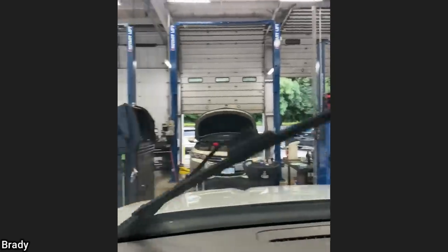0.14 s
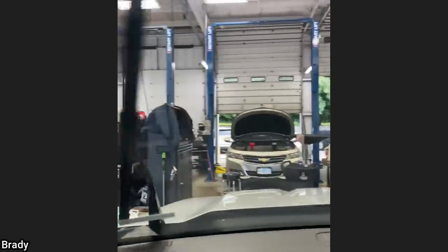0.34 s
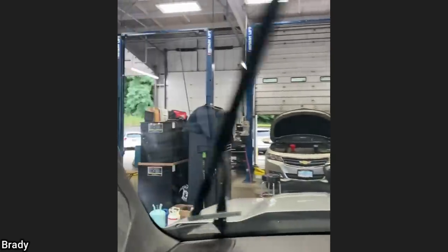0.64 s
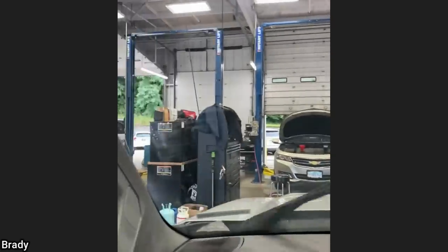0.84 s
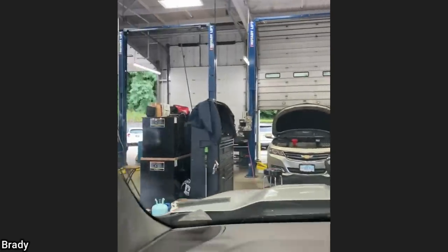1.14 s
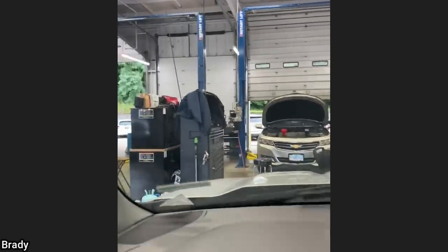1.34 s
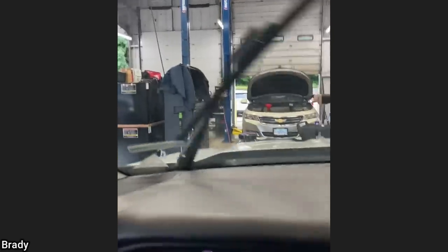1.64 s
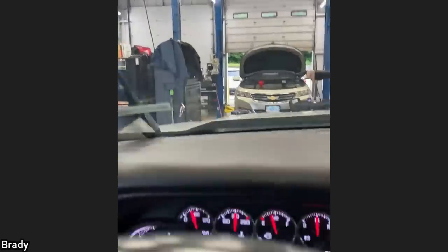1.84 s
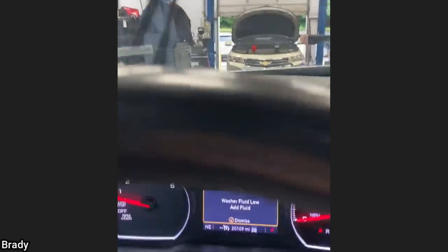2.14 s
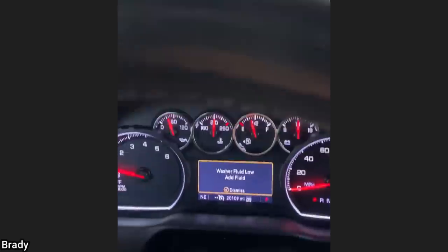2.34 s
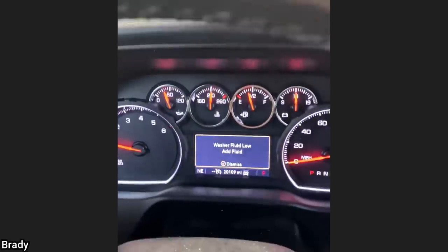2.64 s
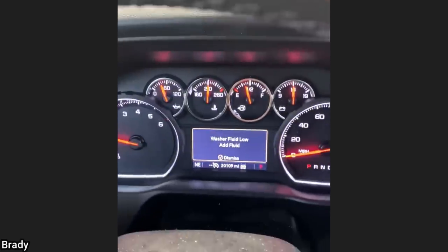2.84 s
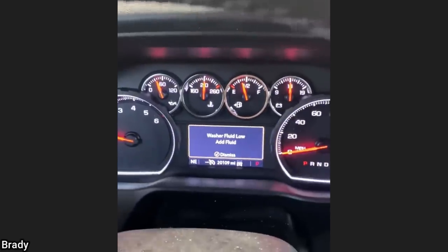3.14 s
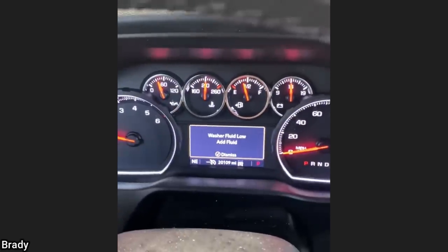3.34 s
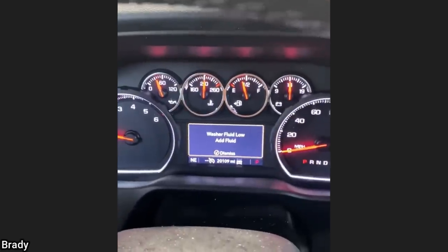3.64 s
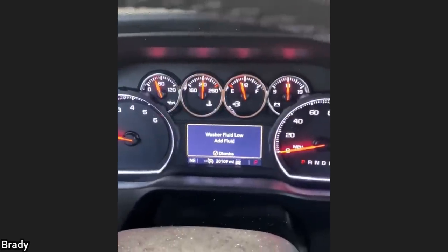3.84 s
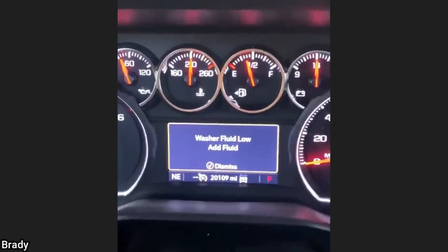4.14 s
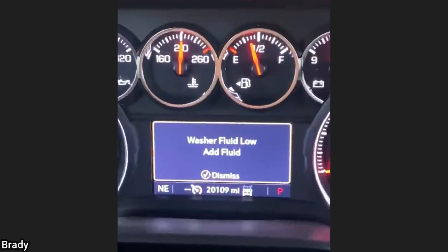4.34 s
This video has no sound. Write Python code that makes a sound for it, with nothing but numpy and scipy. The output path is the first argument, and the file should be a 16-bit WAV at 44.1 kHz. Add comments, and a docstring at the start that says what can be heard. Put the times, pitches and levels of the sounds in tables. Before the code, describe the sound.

A clean mid-pitched electric whine opens, slides downward and stops at about one second. Dry rubber wipers keep sweeping, with gritty scrubbing, airy hiss and little snaps. Every reversal gives a boomy thud with a rattle, alternating firm and soft around every seven tenths of a second. The close stereo microphone sits in the small cab; the background is very quiet, with two brief late hisses.

```python
"""Inside a parked cab a dry washer pump whines, clean shaft tones that run down and ring the panels around it.
Meanwhile the wipers sweep dry glass: shaped noise hisses and scrubs, and the motor rumbles in the body.
Small ticks snap along the sweep; the arms thump ringing panels at each reversal, hard at the top and softer
at the bottom. Later come two short bright puffs of hiss.
A close pair of microphone ports hears it."""
import sys
import numpy as np
from scipy import signal
from scipy.io import wavfile
from scipy.ndimage import uniform_filter1d

SR = 44100
rng = np.random.default_rng(int(sys.argv[2]) if len(sys.argv) > 2 else 0)


def transcribe(u):
    """Save the signal u as a 16-bit wav file named by the first command-line argument.

    u: samples, shape (n,) or (channels, n), limited to [-1, 1]; the rate is SR.
    q: integer samples, one column per channel.
    """
    v = np.clip(np.atleast_2d(u).T, -1, 1)
    q = np.round(v * 32767).astype(np.int16)
    wavfile.write(sys.argv[1], SR, q)


N = 197564

# Reversals of the arms: (time [s], blow and rattle [dB], crack [dB])
TOP_TURNS = [(0.5384, 0, 3), (1.962, 0.5, -1), (3.3835, -1, -2.5)]
BOTTOM_TURNS = [(1.2426, -1.5, .4), (2.6643, -2.5, 0.25), (4.084, -1, 0.14)]
CYCLE_S = 1.4218  # one sweep up and back


def amp(db):
    """Decibels to an amplitude factor."""
    return 10 ** (np.asarray(db) / 20)


def evened(x):
    """Scale a signal to an rms of 1."""
    return x / np.sqrt(np.mean(x ** 2) + 1e-20)


def read(points, hz):
    """Read a (frequency, value) table along a logarithmic pitch axis."""
    f, value = np.transpose(points)
    return np.interp(np.log(hz + 1), np.log(f + 1), value)


def curve(rows, index):
    """Draw one column of a table against time, the first column."""
    return np.interp(np.arange(N) / SR, [r[0] for r in rows], [r[index] for r in rows])


def add(mix, s, sound):
    """Lay a sound into the mix at s seconds, cut off at the end."""
    part = mix[..., round(s * SR):][..., :sound.shape[-1]]
    part += sound[..., :part.shape[-1]]


def noise(colour, size, patchy_db, flicker_db):
    """Two-port noise of rms 1 with drifting patches and a flicker shared by all pitches."""
    # Likeness of the two ports: (frequency [Hz], likeness [0-1])
    likeness = [(60, .9995), (100, .998), (140, .99), (210, .95), (330, .87), (500, .66), (770, .4),
                (1200, .45), (1800, .6), (2800, .55), (4200, .5), (6400, .67), (9800, .45), (15000, .6)]
    # How much louder the left port is: (frequency [Hz], left-right level [dB])
    balance = [(60, .5), (200, 1), (380, 1.2), (700, 2.5), (1300, 1), (2400, -.6), (4400, -1.4), (8000, 0)]
    # How far the left port leads: (frequency [Hz], phase [rad])
    phase_lead = [(700, 0), (1030, -.4), (1800, .2), (2800, 2.4), (4200, 4.4), (5300, 6.2), (15000, 6.4)]
    hop = size // 4
    frames, hz = N // hop + 5, np.fft.rfftfreq(size, 1 / SR)
    a, b, c, d, patches = rng.standard_normal((frames, len(hz), 5)).T
    patches = uniform_filter1d(patches, size=8, axis=0)  # across pitch
    patches = evened(uniform_filter1d(patches, size=12, axis=1))  # across time
    flicker = evened(uniform_filter1d(rng.standard_normal(frames), size=4))

    same = np.clip(read(likeness, hz), 0, 1)[:, None]
    left = a + 1j * b
    right = same * left + np.sqrt(1 - same ** 2) * (c + 1j * d)
    right = right * np.exp(-1j * read(phase_lead, hz))[:, None]
    lean = amp(read(balance, hz) / 2)[:, None]
    level = amp(read(colour, hz)[:, None] + patchy_db * patches + flicker_db * flicker)
    spectra = np.array([left * lean, right / lean]) * level
    return evened(signal.istft(spectra, nperseg=size, noverlap=size - hop)[1][:, :N])


def ports(db, turn, pan_db, lead):
    """A tone whose level and phase differ at the two ports."""
    left = 2 / (1 + amp(-pan_db))
    return np.sqrt(2) * amp(db) * np.array([left * np.sin(turn + lead), (2 - left) * np.sin(turn)])


def shaft_hz(t):
    """The speed under power; then drag in proportion to speed and a steady rubbing slow the shaft."""
    # Shaft speed, sagging most as the wipers load the supply: (time [s], speed [Hz])
    powered_speed = [(0, 425.6), (.4, 423.5), (.55, 420), (.765, 419.8)]
    coast_tau_s, rubbing_hz = .255, 150
    slowing = np.exp(-np.maximum(t - powered_speed[-1][0], 0) / coast_tau_s)
    return np.maximum(curve(powered_speed, index=1) * slowing - rubbing_hz * (1 - slowing), 0)


def pump():
    """Clean shaft tones under power; then the coasting shaft rings panel after panel as it slows."""
    # Pump under power: (time [s], shaft tone [dB], its octave [dB])
    shaft_tones = [(0, -39, -46), (.14, -41, -49.5), (.25, -36, -56), (.36, -35, -67.5), (.46, -36, -62),
                   (.54, -38, -57), (.62, -35.5, -58), (.765, -35.5, -57.5)]
    # Higher orders: (multiple of shaft speed, level at first [dB], level once swelled [dB],
    # left-right level [dB], left lead [rad])
    higher_orders = [(3, -75, -73, 2.2, .3), (4, -68, -65, -1.1, .7), (5, -71, -63.5, -3.1, 1.1),
                     (6, -73, -62.5, -1.1, 1.5), (7, -80, -77, -2.1, 1.6), (8, -79, -75, -1.1, 1.6),
                     (9, -82, -79, .1, 1.6)]
    # Orders of the coasting shaft: (multiple of shaft speed, level before the panels [dB])
    coast_orders = [(1, 0), (2, -14), (3, -10)]
    # Panels around the pump, each passed twice: (resonance [Hz], width of one pass [Hz], level [dB])
    panels = [(405, 44, -35), (348, 34, -24), (272, 30, -29), (164, 24, -26), (500, 50, -29),
              (600, 60, -31), (745, 50, -35)]
    # Impeller noise: (frequency [Hz], relative density [dB])
    whirr_colour = [(250, -13), (500, -6), (900, -3), (1400, 11.5), (2500, -19.5), (3500, -33.5),
                    (5000, -35.5), (9000, -53)]
    off_s, rest_s = .785, 1.05
    buzz_from_s, buzz_rise_s = .3, .18  # the higher orders swell once
    whirr_db = -62.5  # at the starting speed

    t = np.arange(N) / SR
    hz = shaft_hz(t)
    speed = hz / hz[0]
    turn = 2 * np.pi * np.cumsum(hz) / SR
    spinning = np.clip((rest_s - t) / .028, 0, 1)
    powered = np.clip((off_s - t) / .012, 0, 1)  # magnetic orders stop with the current

    run = t / off_s  # the tones drift across the ports
    out = ports(curve(shaft_tones, index=1), turn, 9.5 - 4.5 * run, .5 - .37 * run)
    out += ports(curve(shaft_tones, index=2), 2 * turn, 9.1 - 21 * run, .41)
    swell = np.clip((t - buzz_from_s) / buzz_rise_s, 0, 1)
    for k, first_db, last_db, pan_db, lead in higher_orders:
        waver_db = 1.3 * evened(uniform_filter1d(rng.standard_normal(N), size=2000))
        out += ports(first_db + (last_db - first_db) * swell + waver_db, k * turn, pan_db, lead)
    out *= powered

    coasting = sum(speed ** (k - 1) * ports(db, k * turn, 2.4 * speed, .1) for k, db in coast_orders)
    coasting *= (1 - powered) * spinning
    # The dry impeller drags unevenly
    coasting *= 1 + .45 * evened(uniform_filter1d(rng.standard_normal(N), size=300))
    for mode_hz, width, db in panels:
        panel = signal.iirpeak(mode_hz, mode_hz / width, SR)
        out += amp(db) * signal.lfilter(*panel, signal.lfilter(*panel, coasting))

    whirr = noise(whirr_colour, size=512, patchy_db=1.5, flicker_db=1)
    return out + amp(whirr_db) * spinning * speed ** .4 * whirr


def cycle_starts():
    """The bottom reversals, with the one just before the start."""
    return [BOTTOM_TURNS[0][0] - CYCLE_S] + [row[0] for row in BOTTOM_TURNS]


def slips():
    """The dry rubber grips and lets go at random: a gain with short sharp rises."""
    slips_per_s = 68
    size = np.minimum(rng.exponential(1, N), 2) * (rng.random(N) < slips_per_s / SR)
    decay = amp(-60 * np.arange(2000) / SR / .1)  # falls 60 dB in 0.1 s
    return 1 + .28 * signal.oaconvolve(size, decay)[:N]


def wiping():
    """Rubber hisses and scrubs on the glass; the motor rumbles in the lowest cab resonance."""
    # One wiper cycle, before the slow drift:
    # (time after the bottom reversal [s], hiss [dB], scrub [dB], treble of the scrub [dB])
    stroke = [(0, -100, -54, -3), (.1, -74.5, -59, 0.5), (0.329, -67, -57, 2.5), (.56, -68, -53.5, 1),
              (0.691, -86.5, -60, -7.5), (.78, -73.5, -55, -2), (.95, -71, -55, 1.5), (1.1, -77, -58.5, -2),
              (1.321, -86.5, -58, -1), (1.39, -91.5, -58, -5)]
    # Slow level drift of hiss, scrub and rumble:
    # (time [s], hiss [dB], scrub [dB], rumble [dB], treble of the scrub [dB])
    drift = [(0, 5, 3.5, 2, 1.5), (1.1, -0.5, 2.5, 0.5, -1), (1.8, 3.5, -0.5, -0.5, 3.5),
             (2.6, 0.5, -0.5, -1.5, -2.5), (3.6, 0.5, -1.5, -0.5, -1), (4.48, -2, -1, -2, -1.5)]
    # Colours of blade hiss, blade scrub and motor rumble: (frequency [Hz], relative density [dB])
    hiss_colour = [(2060, -25), (3500, 0), (4760, -11), (5940, -8), (7220, -11.5), (8940, -16.5),
                   (12300, -20.5), (13400, -16.5), (15800, -37.5)]
    scrub_colour = [(150, -23), (250, -4.5), (282, -18), (363, -15.5), (473, -2.5), (715, -4), (861, -14.5),
                    (933, -6.5), (1170, -13.5), (1390, -19.5), (3340, -16), (4850, -35.5), (6000, -33.5),
                    (7800, -75), (13200, -120)]
    rumble_colour = [(12, -44.5), (20, -28.5), (32, -15), (40, -10.5), (48, -18), (65, 4.5), (80, -7),
                     (97, -9), (141, -9), (258, -19), (300, -20), (367, -22.5), (500, -31.5), (650, -40.5),
                     (1100, -120)]
    rumble_db, swell_db, swell_s = -37, 8.5, .033  # the low rumble swells just after each reversal
    treble_from_hz = 1300

    t = np.arange(N) / SR
    s, hiss_db, scrub_db, treble_db = np.transpose(stroke)
    place = t - cycle_starts()[0]
    since = [np.where(t < row[0], np.inf, t - row[0]) for row in TOP_TURNS + BOTTOM_TURNS]
    swell = uniform_filter1d(np.exp(-np.min(since, axis=0) / swell_s), size=900)
    levels_db = [np.interp(place, s, hiss_db, period=CYCLE_S),
                 np.interp(place, s, scrub_db, period=CYCLE_S),
                 rumble_db + swell_db * swell]

    grip = evened(slips())
    hiss = grip * noise(hiss_colour, size=256, patchy_db=2, flicker_db=1)
    scrub = grip ** .5 * noise(scrub_colour, size=512, patchy_db=1.5, flicker_db=1)
    treble = signal.lfilter(*signal.butter(2, treble_from_hz, "high", fs=SR), scrub)
    treble_gain = amp(curve(drift, index=4) + np.interp(place, s, treble_db, period=CYCLE_S))
    scrub = scrub + (treble_gain - 1) * treble
    rumble = noise(rumble_colour, size=4096, patchy_db=.3, flicker_db=.3)
    layers = [hiss, scrub, rumble]
    return sum(amp(levels_db[k] + curve(drift, index=k + 1)) * layer for k, layer in enumerate(layers))


def background():
    """A quiet noise floor lies under everything at an even level."""
    # Colour of the floor: (frequency [Hz], relative density [dB])
    floor_colour = [(2350, -38), (4000, 4.5), (4670, -17.5), (11600, -24.5), (14500, -19.5), (15800, -19.5)]
    return amp(-78) * noise(floor_colour, size=512, patchy_db=2.5, flicker_db=1)


def ticks():
    """Each tick is a short snap of noise around its ring pitch."""
    # Ticks at fixed places of the sweep:
    # (time after the bottom reversal [s], peak before the cycle's strength [dB], ring [Hz])
    sweep_ticks = [(.3855, -45, 2200), (.466, -48, 4200), (.558, -50, 2200), (.9175, -53.5, 2200)]
    # Strength of the sweep ticks, cycle by cycle: level [dB]
    cycle_strength = [-3, 1.5, -5, -1.5]
    # Ticks off the pattern: (time [s], peak [dB], ring [Hz])
    stray_ticks = [(0.695, -67, 1300), (1.47, -51.5, 3710), (1.6751, -59, 3240)]
    out, t = np.zeros((2, N)), np.arange(900) / SR
    sweep = [(start + s, db + cycle_db, hz)
             for start, cycle_db in zip(cycle_starts(), cycle_strength)
             for s, db, hz in sweep_ticks]
    for s, db, hz in sweep + stray_ticks:
        grit = rng.standard_normal((2, len(t))) + rng.standard_normal(len(t))  # partly shared by the ports
        band = signal.butter(2, [.55 * hz, 1.8 * hz], "band", fs=SR)
        snap = amp(-60 * t / .032) * signal.lfilter(*band, grit)
        add(out, s, amp(db) * snap / abs(snap).max())
    return out


def reversals(turns, ring, slaps, edge_hz):
    """Each reversal of one kind rings the same set of panels and slaps out short bursts of rattle."""
    # Colours of the bright crack and the dull rattle: (frequency [Hz], relative density [dB])
    crack_colour = [(400, -20), (1000, 6), (2500, 5.5), (4000, -2), (6000, -16), (8500, -20.5),
                    (10000, -36), (15000, -54)]
    rattle_colour = [(150, -25), (350, 3.5), (700, 1.5), (1200, -8), (2000, -30.5), (4000, -36.5),
                     (9000, -69)]
    t, body, burst = np.arange(-SR // 10, SR // 2) / SR, 0, 0
    for hz, db, start, build, t60 in ring:
        u = np.maximum(t - start, 0)
        shape = (1 - np.exp(-u / build)) ** 2 * amp(-60 * u / t60)
        body = body + amp(db) * np.sqrt(2) * shape / shape.max() * np.sin(2 * np.pi * hz * u)
    for delay, crack_db, rattle_db, rise, t60 in slaps:
        u = np.maximum(t - delay, 0)
        burst = burst + amp([[crack_db], [rattle_db]] - 60 * u / t60) * (1 - np.exp(-u / rise))

    thumps, bursts = np.zeros(N), np.zeros((2, N))
    for s, db, crack_db in turns:
        add(thumps, s + t[0], amp(db) * body)
        add(bursts, s + t[0], amp([[crack_db], [db]]) * burst)
    crack = noise(crack_colour, size=256, patchy_db=3.5, flicker_db=1.5)
    crack = signal.lfilter(*signal.butter(2, edge_hz, fs=SR), crack)
    rattle = noise(rattle_colour, size=256, patchy_db=1, flicker_db=1.5)
    thumps = thumps * amp([[.4], [-.4]])  # dB: a touch louder at the left port
    return thumps + bursts[0] * crack + bursts[1] * rattle


def top_reversals():
    """At the top the arms stop hard; low panels start late and build slowly."""
    # Panels set ringing: (frequency [Hz], relative peak [dB], start [s], build-up [s], 60 dB decay [s])
    top_ring = [(66.45, -18.5, 0.014, 0.031, 0.29), (57, -59, 0.0628, 0.014, 0.31),
                (103.2, -20.5, 0.0066, 0.0027, 0.3), (191.8, -22.5, 0.0072, 0.0026, 0.13),
                (258.7, -29, 0.0031, 0.0075, 0.14), (346, -33, 0.0023, 0.0014, 0.25),
                (315, -24, 0.0177, 0.0017, 0.013), (568, -43, 0.0015, 0.0011, 0.16),
                (657, -40, 0.0012, 0.00055, 0.083)]
    # Linkage slack and the flip of the rubber, relative to the turn:
    # (delay [s], bright crack [dB], dull rattle [dB], rise [s], 60 dB decay [s])
    top_slaps = [(.0015, -44, -43, .001, .045), (.0082, -43, -41, .0008, .04), (.017, -55, -43, .002, .16)]
    return reversals(TOP_TURNS, top_ring, top_slaps, edge_hz=7500)


def bottom_reversals():
    """At the bottom the thump is softer and the rubber flips duller."""
    # Panels set ringing: (frequency [Hz], relative peak [dB], start [s], build-up [s], 60 dB decay [s])
    bottom_ring = [(74.46, -23.5, 0.02555, 0.0067, 0.43), (63, -41.5, 0.0486, 0.06, 0.51),
                   (94.5, -31.5, 0.0076, 0.0049, 0.49), (136.7, -22.5, 0.0065, 0.0063, 0.076),
                   (201.7, -36, 0.00863, 0.0093, 0.14), (250, -35.5, 0.00924, 0.0041, 0.11),
                   (400.5, -45.5, 0.00694, 0.0056, 0.22), (561, -49, 0.0035, 0.0015, 0.16)]
    # Linkage slack and the flip of the rubber, relative to the turn:
    # (delay [s], bright crack [dB], dull rattle [dB], rise [s], 60 dB decay [s])
    bottom_slaps = [(-.066, -68.5, -41, 0.0067, .14), (-.002, -63.5, -44.5, 0.0096, 0.084),
                    (0.012, -55.5, -40, .003, .1), (.027, -64, -55, .004, 0.14)]
    return reversals(BOTTOM_TURNS, bottom_ring, bottom_slaps, edge_hz=4700)


def puffs():
    """Bright hisses of shaped noise that fade in quickly and stop short."""
    # Puffs: (start [s], end [s], level at start [dB], level at end [dB])
    puff_times = [(2.945, 3.043, -59.5, -58), (3.455, 3.58, -68, -76)]
    # Their colour: (frequency [Hz], relative density [dB])
    puff_colour = [(3000, -30), (5000, -5), (8000, -3), (10500, -5), (13000, 0), (15000, -1), (15800, -2)]
    t, level = np.arange(N) / SR, 0
    for start, end, first_db, last_db in puff_times:
        edges = np.clip((t - start) / .023, 0, 1) * np.clip((end - t) / .012, 0, 1)
        level = level + edges * amp(np.interp(t, [start, end], [first_db, last_db]))
    return level * noise(puff_colour, size=256, patchy_db=1, flicker_db=1)


def scene():
    """All sources in the cab, summed at the two ports."""
    sweeping = wiping() + ticks()
    turns = top_reversals() + bottom_reversals()
    return pump() + sweeping + background() + turns + puffs()


def record(dry):
    """A 12 ms fade-in starts the sound; a steep low-pass sets the band limit."""
    edge_hz = 15850
    opened = dry * np.clip(np.arange(N) / (.012 * SR), 0, 1)
    band_limit = signal.firwin(1023, edge_hz, window=("kaiser", 9), fs=SR)
    return signal.oaconvolve(opened, band_limit[None], "same")


dry = scene()
out = record(dry)
transcribe(out)
```